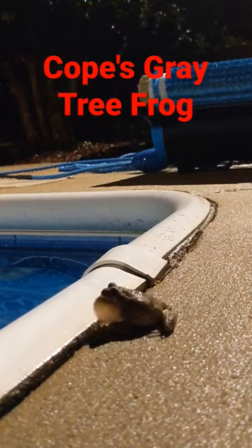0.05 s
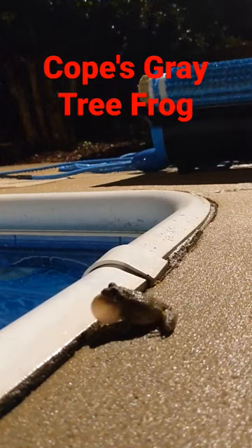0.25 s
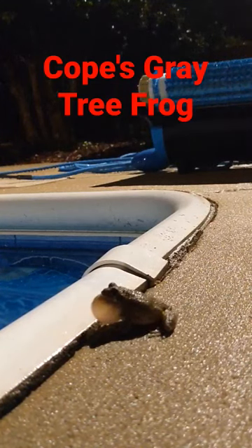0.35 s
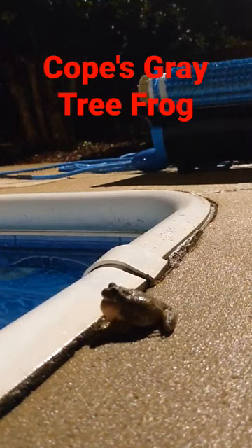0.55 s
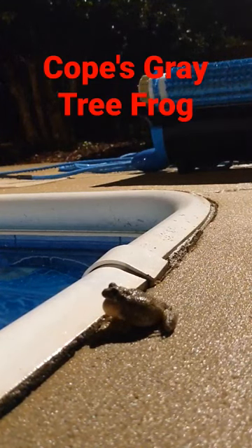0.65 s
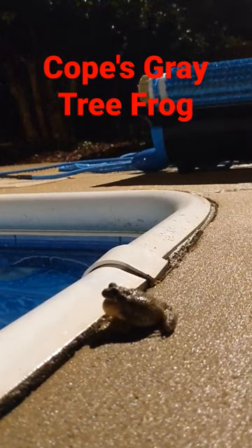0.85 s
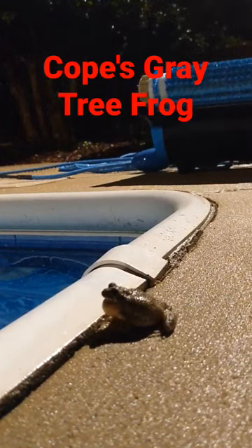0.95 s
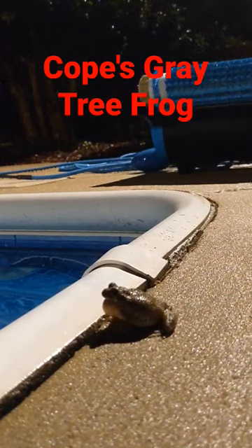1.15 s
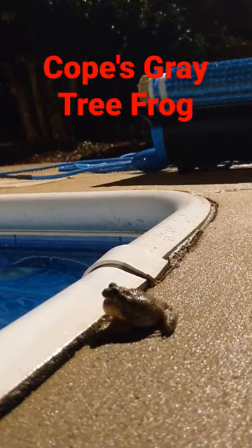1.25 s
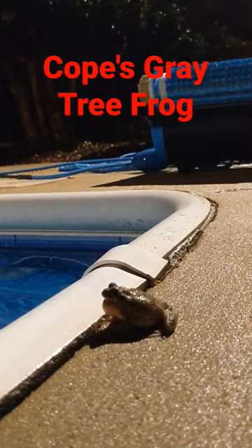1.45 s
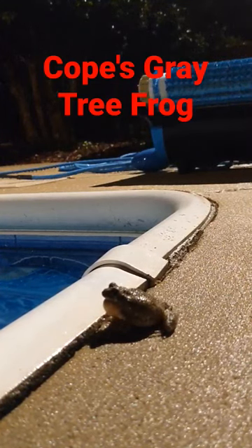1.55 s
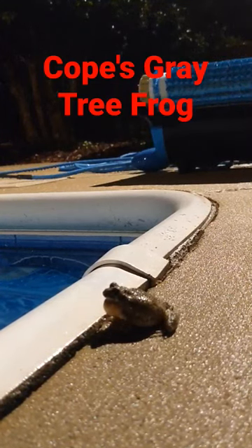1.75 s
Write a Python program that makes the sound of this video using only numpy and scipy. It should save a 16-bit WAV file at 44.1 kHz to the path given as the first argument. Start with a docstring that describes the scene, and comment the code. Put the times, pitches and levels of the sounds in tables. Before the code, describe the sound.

Harsh pulsed frog trill near the microphone, echoing lightly off concrete and water, then a softer, duller trill from farther away. Faint insects, distant chorus and low hum dip under the call and slowly return.

```python
"""Night on a concrete pool deck: insects, a distant chorus and a pump hum sound throughout.
First a tree frog trills close by, in short harmonic tones that glide up; deck, water and walls throw them back.
Gain control dips under this loud call, then slowly lifts the night again.
Next a second frog answers from farther off, duller and with more echo, amid faint treble rustles.
Last come faint, thin whistles, made of gliding sine tones."""
import sys
import numpy as np
from scipy import signal
from scipy.fft import rfft, irfft
from scipy.io import wavfile
from scipy.ndimage import uniform_filter1d

SR = 44100
rng = np.random.default_rng(int(sys.argv[2]) if len(sys.argv) > 2 else 0)


def transcribe(u):
    """Save the signal u as a 16-bit wav file named by the first command-line argument.

    u: samples, shape (n,) or (channels, n), limited to [-1, 1]; the rate is SR.
    q: integer samples, one column per channel.
    """
    v = np.clip(np.atleast_2d(u).T, -1, 1)
    q = np.round(v * 32767).astype(np.int16)
    wavfile.write(sys.argv[1], SR, q)


def voltage_ratio(level):
    """Linear amplitude factor for a level in decibels (scalar or array-like)."""
    return 10 ** (np.asarray(level, float) / 20)


N = 79380  # samples, 1.8 s

# All levels below hold before the gain control.
# Color of the night air noise; only its shape counts: pitch_hz, level_db (per Hz)
NIGHT_COLOR = [(18, -63), (30, -10), (118, -3.5), (199, -4.5), (287, -2), (394, -6.5), (1670, -22),
               (2410, -34.5), (5040, -38.5), (5900, 1.5), (6720, -33), (9970, -29.5), (16000, -43)]
# Steady bands of many distant callers, flickering by chance:
# pitch_hz, width_hz (of each of three filters), level_db (before flicker), fastest_flicker_hz, flicker_share
CHORUS_BANDS = [(1296, 700, -71, 42, 0.36), (2456, 910, -64, 140, 0.1), (4043, 1380, -70.5, 10, 0.067),
                (5744, 1340, -74, 180, 0.1)]
# Tones of the pump hum: pitch_hz, level_db (rms before wavering), waver_share
HUM_TONES = [(59, -68.5, 1), (120.2, -63, 0.69), (125.7, -66.5, 0.11), (150, -89, .4), (291.5, -58.5, 0.34),
             (351, -66.5, 0.42), (376.6, -77.5, 0.16), (418.6, -73, 0.26), (480, -78, 0.13),
             (637, -77, 0.3)]
# Faint treble rustles: start_s, level_db (before the treble filter), fade_s (time to fall 60 dB)
RUSTLE_EVENTS = [(0.778, -54, 0.018), (.785, -60, 0.11), (1.075, -86, 0.018)]
# Faint thin whistles: start_s, length_s, start_hz, middle_hz, end_hz, level_db (peak)
WHISTLE_GLIDES = [(1.135, .04, 11600, 11300, 10700, -82), (1.297, .065, 11100, 11450, 11550, -90),
                  (1.355, 0.052, 11600, 11700, 10700, -79), (1.545, 0.033, 11000, 11400, 11800, -83),
                  (1.57, .06, 9900, 10000, 10350, -73), (1.598, .08, 14600, 15100, 14200, -90)]
# Single echoes of the far frog, the first one full and the rest thin: delay_s, level_db
FAR_FROG_ECHOES = [(.0038, -5), (.0065, -3), (.011, -7)]
# Single echoes of the near frog, the first one full and the rest thin: delay_s, level_db
NEAR_FROG_ECHOES = [(.0031, -11), (.0076, -18), (.0135, -27), (.030, -19), (.0535, -24), (.077, -23)]
# Moments at which the near pulses have swelled up: peak_s
NEAR_PEAKS = [(0.2179), (0.2408), (0.2599), (0.28), (0.3009), (0.3215), (0.3423), (0.3622), (0.3833),
              (0.4034), (0.4242), (0.4448), (0.4653), (0.4856), (0.506), (0.5265), (0.5471), (0.5677),
              (0.5889), (0.61), (0.6319), (0.6531)]
# The near call warms up, then holds: time_s, second_harmonic_db, pitch_hz (at the peak),
# fundamental_db (over the second harmonic, before the sac), glide_hz_per_s, treble_db (added), fall_s
CALL_WARMUP = [(0.22, -31, 988, 3.5, 3050, 5.5, 0.00035), (0.243, -16.5, 1178, 0, 12300, -7.5, 0.0027),
               (0.258, -12.5, 1181, -8.5, 31500, -3, 0.0027), (.28, -8.5, 1162, -11, 35500, 3.5, 0.0018),
               (.30, -6, 1203, -12, 46300, 5, 0.0017), (0.422, -6, 1220, -12, 51800, -0.5, 0.002),
               (.65, -5, 1223, -13, 49100, -2, 0.0018)]
# Third harmonic upward: level_db (over the second, before treble_db)
OVERTONE_LEVELS = [-14.5, -33.5, -32, -31, -41]
# Airy rasp of each pulse: pitch_hz, width_hz, level_db (rough, over the pulse, before treble_db)
RASP_BANDS = [(4350, 1860, -37.5), (6160, 1600, -65), (7480, 640, -42.5), (9620, 240, -56),
              (11930, 240, -59.5), (14700, 300, -56.5)]

NIGHT_DB, HUM_DRIFT_TURNS = -57.5, 0.05  # air noise level; rms phase drift of the hum

# One pulse: swell time, and glide limits in seconds from the peak
RISE_S, GLIDE_FROM_S, GLIDE_TO_S = 0.0048, -0.0048, 0.0031
FIRST_FALL, OVERTONE_FALL = 1.25, 0.9  # fall times as shares of the second harmonic's
WOBBLE, UNEVEN_DB = 0.004, 0.92  # rms pitch unsteadiness as a share; spread of pulse levels
SAC_HZ, SAC_WIDTH_HZ, SAC_SHARE = 1400, 260, 0.45  # vocal sac, for a 1200 Hz pitch
THROAT_HZ, THROAT_WIDTH_HZ, THROAT_SHARE = 2380, 600, 0.4  # throat, for a 1200 Hz pitch
RASP_RISE_S, RASP_FALL_S = 0.002, 0.0049

# Space: upper limit of the echoes; later ones favor the second harmonic
ECHO_TOP_HZ, THIN_HZ, THIN_WIDTH_HZ, THIN_SHARE = 3740, 2500, 1200, 0.75
NEAR_TAIL_DB, NEAR_TAIL_T60_S = -26, 0.6
FAR_TAIL_DB, FAR_TAIL_T60_S = 3, 0.27

# Far frog: peak k comes at start + gap * k + slowing * k^2
FAR_START_S, FAR_GAP_S, FAR_SLOWING_S, FAR_PULSES = 0.6864, 0.020357, 3.69e-5, 26
FAR_DB, FAR_SECOND_DB = -40.5, -2  # fundamental before the sac; second harmonic over it
FAR_HZ, FAR_GLIDE_HZ_PER_S, FAR_DULL_DB, FAR_FALL_S = 1291.6, 55000, -7.5, 0.00099

PUSH_HZ, PUSH_WIDTH_HZ, PUSH_DB = 100, 70, -27  # low thud with each near pulse; level before its filter

# Gain control: most boost, level where it starts to turn down, smoothing time; then recovery share and speeds
BOOST_DB, KNEE_DB, GRAB_S = 13, -29, 0.013
QUICK_SHARE, QUICK_DB_PER_S, SLOW_DB_PER_S = 0.15, 55, 5


def evened(x):
    """Scales a sound to an rms of 1."""
    return x / np.sqrt(np.mean(x ** 2) + 1e-20)


def add(mix, s, sound):
    """Adds a sound at s seconds, cut off at the end of the mix."""
    part = mix[round(s * SR):][:len(sound)]
    part += sound[:len(part)]


def resonate(x, hz, width):
    """Rings at one pitch with a gain of about 1 there; a smaller width rings longer."""
    turn = np.exp(2j * np.pi * hz * np.arange(len(x)) / SR)
    r = np.exp(-np.pi * abs(width) / SR)
    return 2 * (turn * signal.lfilter([1 - r], [1, -r], x / turn)).real


def drift(hz):
    """Slow chance movement of rms 1, mostly below hz."""
    noise = rng.standard_normal(N + SR)
    return evened(signal.lfilter(*signal.butter(2, hz, fs=SR), noise)[SR:])  # skips the filter's start


def air_noise():
    """Steady noise, shaped by scaling each of its frequencies."""
    f, db = np.transpose(NIGHT_COLOR)
    hz = np.fft.rfftfreq(N, 1 / SR)
    color = voltage_ratio(np.interp(np.log(hz + 1), np.log(f + 1), db))
    return voltage_ratio(NIGHT_DB) * evened(irfft(rfft(rng.standard_normal(N)) * color, N))


def distant_chorus():
    """Many insects and distant callers blur into flickering bands of noise."""
    out = np.zeros(N)
    for hz, width, db, rate, depth in CHORUS_BANDS:
        band = rng.standard_normal(N)
        for _ in range(3):
            band = resonate(band, hz, width)
        flicker = (1 + depth * drift(rate)) * voltage_ratio(drift(6))  # plus a slow drift of 1 dB rms
        out += voltage_ratio(db) * evened(band) * flicker
    return out


def pump_hum():
    """Steady sine tones whose loudness and phase waver by chance."""
    out, t = np.zeros(N), np.arange(N) / SR
    for hz, db, waver in HUM_TONES:
        loudness = voltage_ratio(db) * np.sqrt(2) * (1 + waver * drift(7.9))
        turns = hz * t + HUM_DRIFT_TURNS * drift(1.7) + rng.random()
        out += loudness * np.sin(2 * np.pi * turns)
    return out


def rustles():
    """Short fading bursts of noise, kept to the treble above 8 kHz."""
    out, t = np.zeros(N), np.arange(4000) / SR
    treble = signal.butter(4, 8000, "high", fs=SR, output="sos")
    hiss = signal.sosfilt(treble, rng.standard_normal(4000))
    for s, db, t60 in RUSTLE_EVENTS:
        add(out, s, voltage_ratio(db - 60 * t / t60) * hiss)
    return out


def whistles():
    """Thin sine tones high in the treble, each gliding along a curve through three pitches."""
    out = np.zeros(N)
    for s, length, a, b, c, db in WHISTLE_GLIDES:
        u = np.arange(0, 1, 1 / (length * SR))  # share of the whistle passed
        hz = a + (4 * b - 3 * a - c) * u + 2 * (a + c - 2 * b) * u ** 2
        tone = np.sin(2 * np.pi * np.cumsum(hz) / SR)
        add(out, s, voltage_ratio(db) * np.sin(np.pi * u) ** 0.5 * tone)
    return out


def space(x, echoes, tail_db, t60):
    """Surfaces throw sound back: one close full echo, then thinner single echoes and a diffuse tail."""
    t = np.arange(SR // 2) / SR
    tail = rng.standard_normal(len(t)) * voltage_ratio(-60 * t / t60) * np.minimum(t / 0.011, 1)  # builds up in 11 ms
    taps = voltage_ratio(tail_db) * tail / np.linalg.norm(tail)
    for s, db in echoes[1:]:
        taps[round(s * SR)] += voltage_ratio(db)
    dull = signal.lfilter(*signal.butter(2, ECHO_TOP_HZ, fs=SR), x)
    narrow = resonate(resonate(dull, THIN_HZ, THIN_WIDTH_HZ), THIN_HZ, THIN_WIDTH_HZ)
    thin = (1 - THIN_SHARE) * dull + THIN_SHARE * narrow
    out = x + signal.fftconvolve(thin, taps)[:N]
    first_delay, first_db = echoes[0]
    add(out, first_delay, voltage_ratio(first_db) * dull)
    return out


def pulse(hz, first_db, glide, treble_db, fall):
    """A swelling, rising harmonic tone with sac ring and rasp; second harmonic at a gain of about 1."""
    t = np.arange(1600) / SR
    noise, wob = rng.standard_normal((2, len(t)))
    swell = np.sin(np.pi / 2 * np.minimum(t / RISE_S, 1)) ** 2
    past = np.maximum(t - RISE_S, 0) / fall

    unsteady = 1 + WOBBLE * evened(uniform_filter1d(wob, 40))
    pitch = hz * unsteady + glide * np.clip(t - RISE_S, GLIDE_FROM_S, GLIDE_TO_S)
    phase = 2 * np.pi * np.cumsum(pitch) / SR

    # The vocal sac lifts the fundamental as it rises and rings on
    first = swell / np.cosh(past / FIRST_FALL) * np.sin(phase)
    sac = resonate(first, SAC_HZ + hz - 1200, SAC_WIDTH_HZ)
    first = (1 - SAC_SHARE) * first + 3 * SAC_SHARE * sac

    # The throat firms the second harmonic
    second = swell / np.cosh(past) * np.sin(2 * phase)
    throat = resonate(second, THROAT_HZ * hz / 1200, THROAT_WIDTH_HZ)
    second = (1 - THROAT_SHARE) * second + THROAT_SHARE * throat

    high = sum(voltage_ratio(db) * np.sin((k + 3) * phase) for k, db in enumerate(OVERTONE_LEVELS))
    high = high * swell / np.cosh(past / OVERTONE_FALL)

    # Airy noise, puffing once per cycle of the fundamental
    puff_shape = np.minimum(t / RASP_RISE_S, 1) / np.cosh(np.maximum(t - 0.003, 0) / RASP_FALL_S)
    puff = noise * puff_shape * (1 + np.cos(phase))
    rasp = np.zeros(len(t))
    for f, width, db in RASP_BANDS:
        rasp += voltage_ratio(db) * np.sqrt(SR / width) * resonate(resonate(puff, f, 2 * width), f, width)

    tone = voltage_ratio(first_db) * first + second + voltage_ratio(treble_db) * (high + rasp)
    return voltage_ratio(UNEVEN_DB * wob[0]) * tone


def far_frog():
    """The same kind of pulses at steady settings, dull and full of echo, slowing a little."""
    out = np.zeros(N)
    for k in range(FAR_PULSES):
        peak = FAR_START_S + FAR_GAP_S * k + FAR_SLOWING_S * k ** 2
        sound = pulse(FAR_HZ, -FAR_SECOND_DB, FAR_GLIDE_HZ_PER_S, FAR_DULL_DB, FAR_FALL_S)
        add(out, peak - RISE_S, voltage_ratio(FAR_DB + FAR_SECOND_DB) * sound)
    return space(out, FAR_FROG_ECHOES, FAR_TAIL_DB, FAR_TAIL_T60_S)


def near_frog():
    """The loud trill warms up and echoes; a smooth push rings as a low thud with each pulse."""
    out, push = np.zeros((2, N))
    at, *controls = np.transpose(CALL_WARMUP)
    for s in NEAR_PEAKS:
        db, hz, first_db, glide, treble_db, fall = (np.interp(s, at, c) for c in controls)
        add(out, s - RISE_S, voltage_ratio(db) * pulse(hz, first_db, glide, treble_db, fall))
        add(push, s - RISE_S, voltage_ratio(db + treble_db + PUSH_DB) * np.hanning(200))
    thuds = resonate(push, PUSH_HZ, PUSH_WIDTH_HZ)
    return space(out, NEAR_FROG_ECHOES, NEAR_TAIL_DB, NEAR_TAIL_T60_S) + thuds


def scene():
    """Adds the night and both frogs into one channel."""
    night = air_noise() + distant_chorus() + pump_hum() + rustles()
    return (night + whistles() + far_frog() + near_frog())[None]


def low_pass(x):
    """Removes everything above the highest recorded frequency."""
    return signal.sosfilt(signal.butter(12, 16270, fs=SR, output="sos"), x)


def record(dry):
    """Gain control lifts quiet sound, drops under the call, recovers partly fast, partly slowly."""
    power_db = 10 * np.log10(abs(uniform_filter1d(dry[0] ** 2, 900)) + 1e-12)
    over = np.clip(power_db - KNEE_DB, 0, BOOST_DB)
    t, cut = np.arange(N) / SR, 0
    for share, speed in (QUICK_SHARE, QUICK_DB_PER_S), (1 - QUICK_SHARE, SLOW_DB_PER_S):
        # Follows each rise at once, then lets go at a steady speed
        held = np.maximum.accumulate(share * over + speed * t) - speed * t
        cut = cut + np.maximum(held, 0)
    r = np.exp(-1 / (GRAB_S * SR))
    smooth_cut = signal.lfilter([1 - r], [1, -r], cut)
    mix = dry * voltage_ratio(BOOST_DB - smooth_cut)
    return low_pass(mix)


dry = scene()
out = record(dry)
transcribe(out)
```